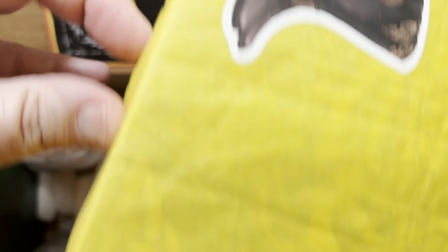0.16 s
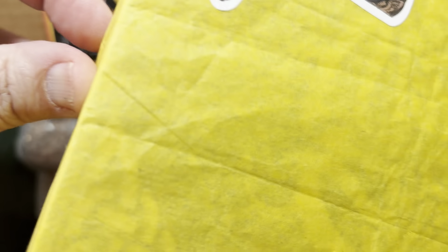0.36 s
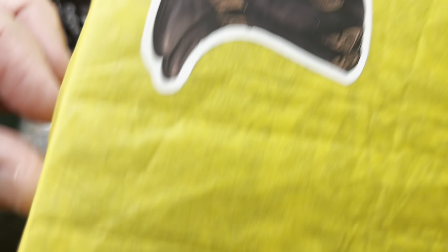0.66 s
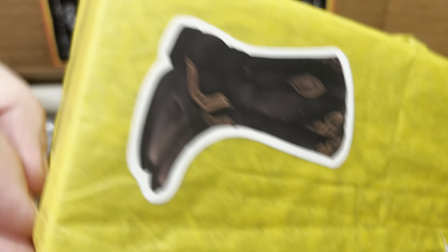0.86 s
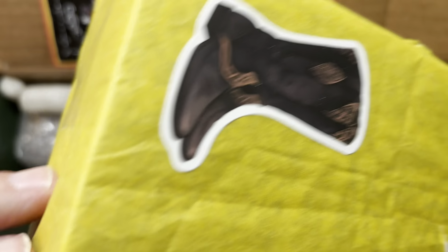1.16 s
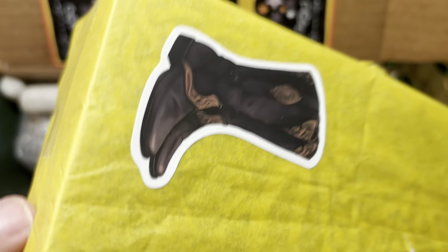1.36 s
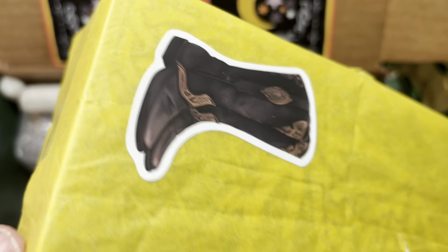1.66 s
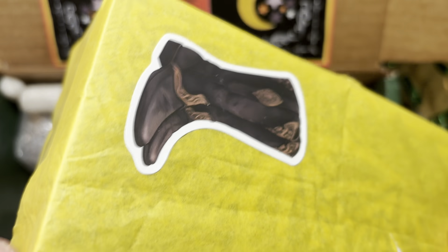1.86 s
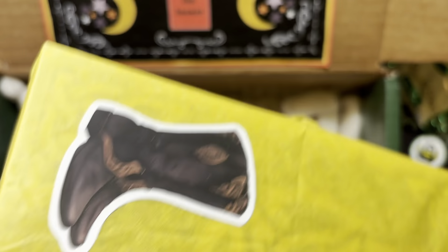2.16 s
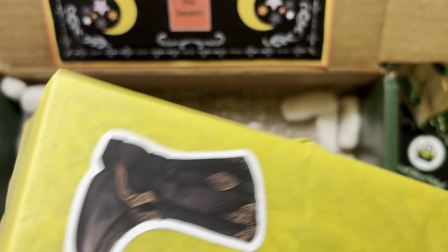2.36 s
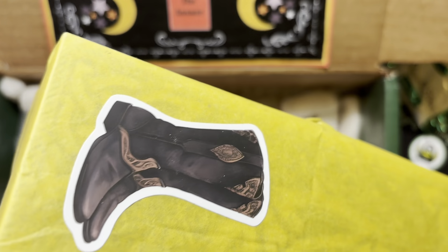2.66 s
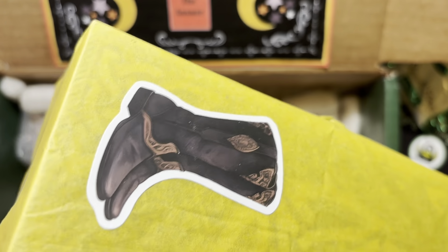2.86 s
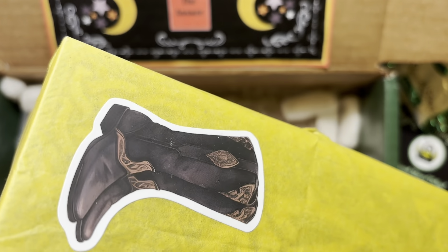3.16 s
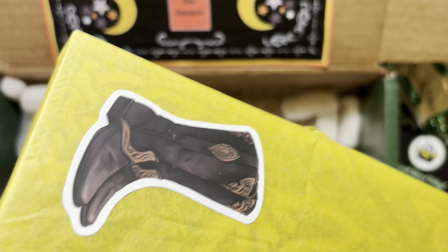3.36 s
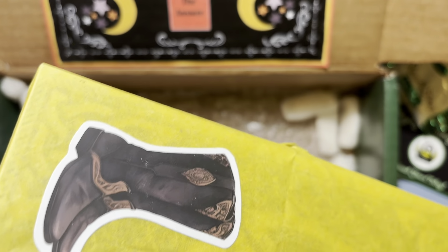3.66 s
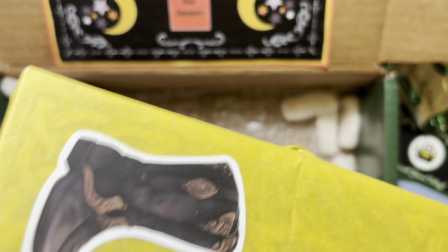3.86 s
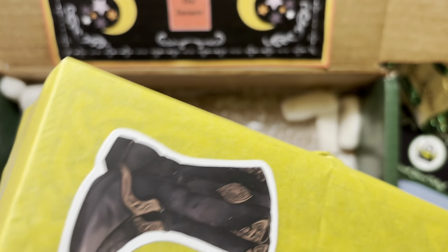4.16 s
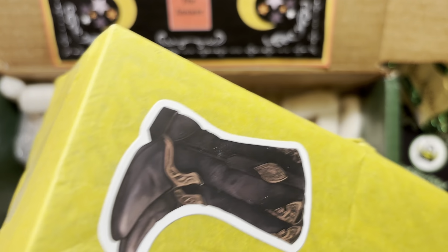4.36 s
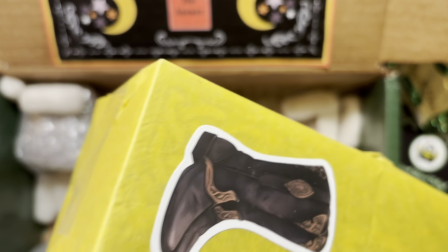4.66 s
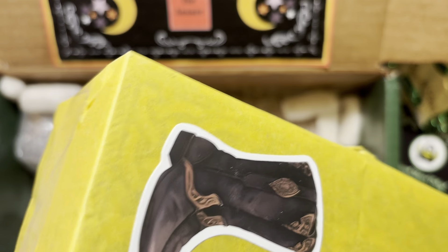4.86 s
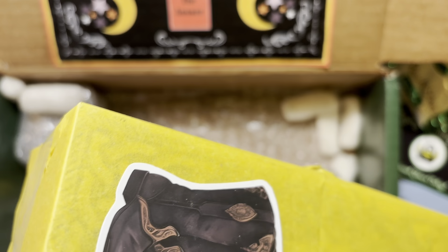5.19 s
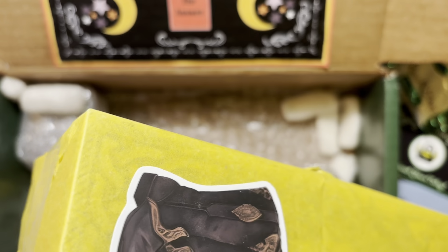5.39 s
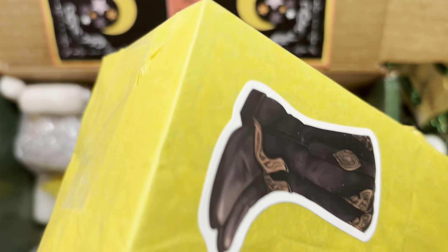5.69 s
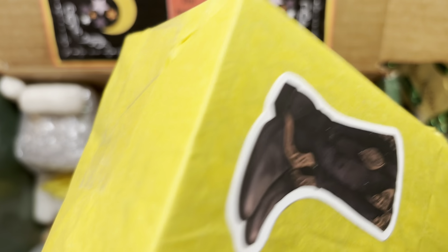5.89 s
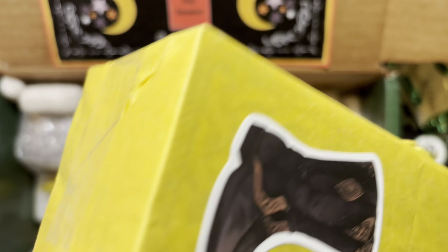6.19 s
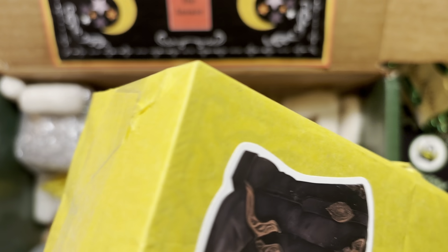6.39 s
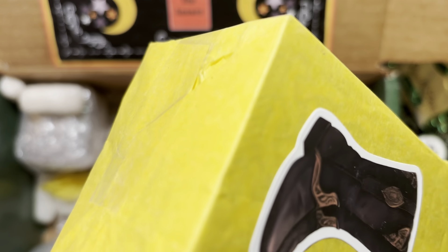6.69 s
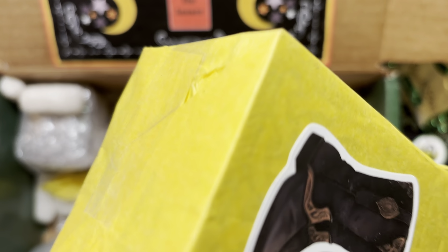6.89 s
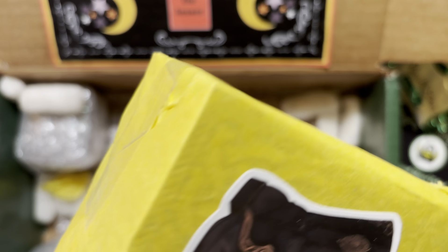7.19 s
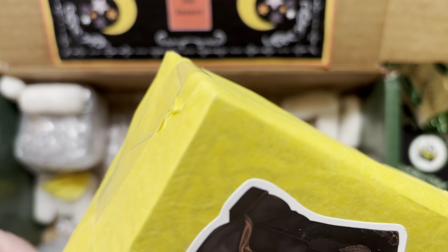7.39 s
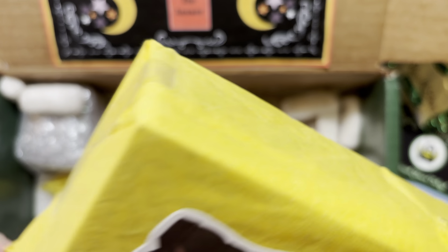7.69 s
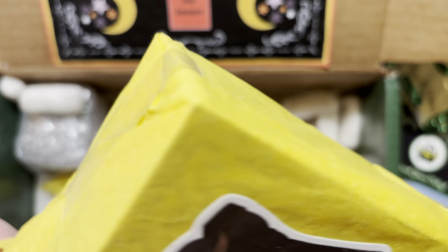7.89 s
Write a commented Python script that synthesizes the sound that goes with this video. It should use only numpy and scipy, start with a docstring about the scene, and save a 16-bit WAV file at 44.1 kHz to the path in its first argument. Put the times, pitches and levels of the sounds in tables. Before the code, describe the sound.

Very close stereo sound of fingers on a small cardboard box wrapped in thin tissue paper. Light slides and small crease snaps open it, with one sharper crackle and soft knock at about two seconds. After a quiet stretch come dense crackling pulls and a hollow knock, then nearly continuous crisp crinkling and tearing to the end. Quiet, short-echoing room.

```python
"""In a quiet room, hands turn a cardboard gift box wrapped in thin tissue paper, close to the microphone.
Fingers slide, pull and tear: sliding is filtered hiss, tearing is a crackle of tiny random clicks, and
the sheet rustles along. Creases snap as short bursts of noise. The hollow box underneath answers with
dull rubs and soft knocks, made of fading sine waves. Low handling rumble, a faint hush and echoes
of the room lie around it all, in stereo."""
import sys
import numpy as np
from scipy import signal
from scipy.fft import rfft, irfft, next_fast_len
from scipy.io import wavfile
from scipy.ndimage import uniform_filter1d

SR = 44100
rng = np.random.default_rng(int(sys.argv[2]) if len(sys.argv) > 2 else 0)


def digitize_waveform(pressure):
    """Quantize a signal to 16-bit integers and store it at the path in sys.argv[1].

    Rows of a 2-D input are taken as channels; values are limited to [-1, 1].
    """
    field = np.atleast_2d(pressure).T
    bounded = np.clip(field, -1, 1)
    quanta = np.round(bounded * 32767).astype(np.int16)
    wavfile.write(sys.argv[1], SR, quanta)


N = 354563
TIME = np.arange(N) / SR
SIZE = next_fast_len(N + SR // 2, True)  # padded length for filtering
HZ = np.arange(SIZE // 2 + 1) * SR / SIZE

# Throughout: a t60 is the time [s] in which a sound fades by 60 dB.
# Colour tables give only the balance between pitches, not the loudness.

ATTACK_DB_PER_S, RELEASE_DB_PER_S, BOX_RELEASE_DB_PER_S = 997, 760, 600
ARCH_DB = 2


def stroke(t, hold, release_db_per_s):
    """Gain of one stroke: the fingers take hold, press hardest at the middle and let go."""
    arch = np.sin(np.pi * np.clip(t / hold, 0, 1)) - 2 / np.pi
    attack_db = ATTACK_DB_PER_S * np.minimum(t, 0)
    release_db = release_db_per_s * np.maximum(t - hold, 0)
    return from_db(attack_db + ARCH_DB * arch - release_db)


# Strokes of the fingers, from light slides to hard pulls; levels before the arch and later trims:
# (start time [s], hold time [s], fibre crackle level [dB], sheet rustle level [dB], box rub level [dB])
STROKES = [(0.084, 0.0083, -57, -47.5, -49.5), (0.117, 0.033, -60.5, -60.5, -62),
           (0.209, 0.037, -51, -53, -53), (0.303, 0.031, -57, -67, -86), (0.415, 0.059, -58.5, -61, -57.5),
           (0.554, 0.006, -61, -68, -69.5), (0.609, 0.067, -65.5, -71, -68.5), (0.79, 0.059, -62, -66, -73),
           (0.913, 0.16, -57.5, -69.5, -69.5), (1.19, 0.14, -73, -67.0, -67),
           (1.408, 0.06, -58.0, -63, -48.5), (1.625, 0.32, -65.0, -66.5, -62),
           (1.93, 0.11, -63.5, -76, -70), (2.065, 0.0067, -35.5, -45.0, -43),
           (2.098, 0.038, -46, -50, -45.0), (2.154, 0.076, -57.5, -62, -61.5),
           (2.439, 0.062, -67.5, -76.5, -71.0), (2.673, 0.12, -61, -70, -72.5),
           (2.811, 0.1, -65, -68, -68.5), (2.974, 0.046, -71, -72.5, -68), (3.15, 0.079, -72.5, -82, -71),
           (3.324, 0.11, -72.5, -72.5, -59.5), (3.549, 0.16, -66, -74, -67.5),
           (3.73, 0.068, -49, -60.5, -58), (3.851, 0.054, -29.5, -46, -46.5),
           (3.971, 0.05, -31.5, -45.5, -47), (4.027, 0.103, -36.5, -48.5, -50.5),
           (4.147, 0.084, -41.0, -53, -52), (4.229, 0.11, -35.5, -46.5, -49),
           (4.374, 0.054, -26.5, -43, -43), (4.396, 0.034, -26.5, -32, -38), (4.774, 0.13, -65, -78, -79.5),
           (5.05, 0.13, -58.5, -63.5, -63), (5.195, 0.055, -48.0, -52, -56.5),
           (5.247, 0.017, -38.5, -47.5, -44.5), (5.538, 0.096, -34.5, -47, -74.5),
           (5.638, 0.16, -54, -79, -94), (5.808, 0.019, -34, -49, -65), (5.847, 0.045, -28.5, -38, -62),
           (5.909, 0.017, -27.5, -33.5, -51.5), (6.078, 0.071, -53, -58.0, -77),
           (6.202, 0.096, -55.5, -64, -79), (6.275, 0.0089, -32.0, -46.5, -56),
           (6.372, 0.098, -40.5, -51.5, -71.5), (6.498, 0.12, -40.5, -49.5, -74.5),
           (6.611, 0.089, -37.5, -43.5, -68), (6.696, 0.13, -45, -50, -77),
           (6.937, 0.083, -41.0, -46.5, -70.0), (7.056, 0.039, -48, -49.0, -59.5),
           (7.119, 0.069, -51.5, -56, -67), (7.359, 0.029, -48.5, -60, -74),
           (7.457, 0.016, -50.5, -59.5, -68.5), (7.525, 0.078, -38, -52.0, -64.5),
           (7.665, 0.021, -32.5, -42, -49.5), (7.701, 0.093, -45.0, -55, -63.5),
           (7.824, 0.11, -34.5, -45, -50.0), (7.934, 0.2, -36.5, -47.5, -55.5)]
# The hands rest on the gift between strokes: (time [s], contact level before trims [dB])
CONTACT = [(0, -87), (0.75, -82), (1.2, -71.5), (1.9, -65.5), (2.35, -81), (3.1, -80), (3.5, -86),
           (3.75, -65), (4.4, -59), (4.62, -79), (4.8, -66), (4.98, -69.5), (5.3, -62), (5.55, -55),
           (6.01, -70.5), (6.3, -51), (6.9, -63), (7.3, -60.5), (8.04, -50)]
CONTACT_SHEET_DB = -6  # sheet compared with the contact
CONTACT_BOX_DB, CONTACT_BOX_FOLLOWS = -76.5, 0.088  # box at mean contact; its share of the swing
UNSTEADY_DB, UNSTEADY_PER_S = 1.5, 45  # the pressure of the fingers wavers
# Level of fibres and sheet rises and falls briefly around each snap:
# top compared with the level of the snap, speed of rise and fall
SWELL_DB, SWELL_DB_PER_S = -26, 1200


def hands():
    """Levels [dB] of fibres, sheet and box: strokes and swells around the snaps add power to the contact."""
    contact_db, = in_time(CONTACT)
    box_contact_db = CONTACT_BOX_DB + CONTACT_BOX_FOLLOWS * (contact_db - contact_db.mean())
    power = from_db([contact_db, contact_db + CONTACT_SHEET_DB, box_contact_db]) ** 2
    releases = np.array([[RELEASE_DB_PER_S], [RELEASE_DB_PER_S], [BOX_RELEASE_DB_PER_S]])
    for start, hold, *levels_db in STROKES:
        span = slice(*np.searchsorted(TIME, [start - .1, start + hold + .2]))
        gain = stroke(TIME[span] - start, hold, releases)
        power[:, span] += (from_db(levels_db)[:, None] * gain) ** 2
    for s, level_db, weight_db in SNAPS:
        span = slice(*np.searchsorted(TIME, [s - .05, s + .05]))
        swell_db = level_db + SWELL_DB - SWELL_DB_PER_S * np.abs(TIME[span] - s)
        power[:2, span] += from_db([swell_db, swell_db + weight_db + CONTACT_SHEET_DB]) ** 2
    return 10 * np.log10(power) + UNSTEADY_DB * drift(UNSTEADY_PER_S)


FLUTTER_DB, FLUTTER_T60_S = -26, .012  # weak flutter after each tiny crack


def crackle(per_s, spread_db, clump_db, t60, count=12):
    """Fibres catch and let go at random, in clumps and all sizes, each on one of a dozen facets; level near 1."""
    born = rng.random(N) < per_s / SR
    size_db = spread_db * np.minimum(rng.exponential(1, N), 4)
    sizes = from_db(size_db + clump_db * drift(220))
    slips = born * sizes * rng.choice([-1, 1], N)
    dealt = rng.integers(0, count, N)
    out = np.zeros(N)
    for k in range(count):
        out += signal.oaconvolve(slips * (dealt == k), facet(t60, FLUTTER_DB, FLUTTER_T60_S))[:N]
    # divide by the running loudness, so that busy and sparse crackle come out equally loud
    usual = uniform_filter1d(np.abs(out), size=1500) * np.sqrt(np.pi / 2)
    return out / (usual + 1e-9)


# How the fingers meet the paper: (time [s], share that catches and tears rather than slides [0-1])
GRIP = [(0, 0.12), (1.9, 0.12), (2.1, 0.55), (2.5, 0.06), (3.45, 0.35), (3.7, 1), (4.4, .9), (4.8, 0.18),
        (5.5, 0.93), (6.6, 0.98), (8.0, 0.5)]
# Colour of the tearing fibres, also used by the creases: (frequency [Hz], level per Hz [dB])
FIBRES = [(200, -51), (1200, -42.5), (2400, -6.5), (3700, -2.5), (4500, -1), (5400, 4), (7000, 1),
          (9500, 2.5), (12000, 2), (14000, 4), (15800, -4.5)]
# Colour of skin sliding on paper: (frequency [Hz], level per Hz [dB])
SLIDE = [(1500, -29), (3000, -3.5), (4200, -4.5), (5200, -6), (8000, -4), (10000, -2.5), (13000, -1.5),
         (15800, -7.5)]
# Colour of the rustling sheet, also used by the creases: (frequency [Hz], level per Hz [dB])
SHEET = [(60, -38), (350, -20), (700, -6), (1000, 4.5), (1200, 5.5), (1400, 1.5), (1750, 6), (2400, 4.5),
         (3200, -2), (5000, -13), (9000, -55.5)]


def wrapping(fibre_db, sheet_db, box_db):
    """Sliding skin hisses, gripped paper crackles; a harder pull frees more fibres a second."""
    grip = np.clip(in_time(GRIP)[0], 0, 1)
    caught, gliding = np.sqrt(grip), np.sqrt(1 - grip)
    per_s = 2000 * from_db(.55 * (fibre_db + 43.5))
    slips = caught * crackle(per_s, spread_db=3.5, clump_db=3.0, t60=0.0019)
    buckles = caught * crackle(per_s, spread_db=4.5, clump_db=-1.0, t60=0.0051)
    hiss = gliding * rng.standard_normal(N) * from_db(2.64 * drift(300))
    drag = crackle(3000, spread_db=2.0, clump_db=3.5, t60=0.0014)
    tearing = colour(slips * from_db(fibre_db - 0.45), FIBRES)
    sliding = colour(hiss * from_db(fibre_db + 0.64), SLIDE)
    # the sheet is shaken by the same slips and hiss, and buckles a little on its own
    shaking = 0.49 * slips + 0.76 * buckles + hiss
    sheet = colour(shaking * from_db(sheet_db - 1.9), SHEET)
    box = hollow(drag * from_db(box_db), ring_db=-3.5, dull_db=-5.5)
    return tearing + sliding + sheet + box


SNAP_FLUTTER_DB, SNAP_FLUTTER_T60_S = -15, .018


def facet(t60, tail_db, tail_t60, size=1024):
    """One patch of paper flips: a sharp crack of noise with a weaker, longer flutter; unit energy."""
    t = TIME[:size]
    fade = from_db(-60 * t / t60) + from_db(tail_db - 60 * t / tail_t60)
    burst = rng.choice([-1, 1], size) * rng.uniform(.5, 1, size) * fade
    return burst / np.sqrt(np.sum(burst ** 2))


# The clearest creases snapping through, before trims:
# (time [s], level [dB], weight of the sheet compared with the crack [dB])
SNAPS = [(0.089, -44, 14.5), (0.1973, -44, -1), (0.3252, -40.5, -4), (0.445, -39, 7), (0.653, -61, 21),
         (0.8237, -31, 1.5), (0.874, -37, -3.5), (0.973, -37.5, -2), (1.098, -46.5, 2), (1.11, -50, -9),
         (1.3247, -49.5, 3), (1.56, -42.5, 2.5), (1.593, -42.5, -5), (1.6593, -47, 0), (1.8824, -41.5, 5),
         (2.064, -25, 1), (2.108, -21, 3), (2.4105, -47.5, 4), (2.9757, -53, -2), (3.2948, -49.5, -21),
         (3.3108, -44.5, -14), (3.5887, -46, -17), (3.8112, -31.5, -12), (3.9081, -20, -15),
         (4.2061, -27.5, -0.5), (4.366, -26, -13), (4.378, -22, 0), (4.592, -40.5, -18), (4.7069, -45, -21),
         (5.1316, -35, -7), (5.2512, -30.5, -3), (5.2778, -39, -1), (5.2975, -33.5, -7), (5.328, -47, -14),
         (5.4098, -53, 4), (5.6235, -20, -4), (5.6575, -28, -5), (5.684, -35.5, 1.5), (5.799, -26, -20),
         (5.854, -19, 2), (6.082, -34, 0), (6.2801, -22, -24), (6.364, -29, -13), (6.4477, -28.5, -3),
         (6.46, -46.5, 22), (6.5445, -26, 2), (6.6347, -25, 5.5), (6.7249, -29.5, 12), (6.827, -32.5, 1),
         (6.9058, -36, -6.5), (6.9472, -36.5, 9), (7.189, -39, 2), (7.465, -32, -20), (7.5223, -31, -18),
         (7.6538, -25.5, -25), (7.7269, -30.5, 1)]


def creases(snaps):
    """A crease buckles with one bright crack; a louder one lasts longer, and the sheet moves as well."""
    bright, heavy = np.zeros(SIZE), np.zeros(SIZE)
    for s, level_db, weight_db in snaps:
        crack_t60 = 0.0015 * from_db(0.5 * (level_db + 28.5))
        crack = from_db(level_db + 19.0) * facet(crack_t60, SNAP_FLUTTER_DB, SNAP_FLUTTER_T60_S)
        at = int(s * SR)
        bright[at:at + len(crack)] += crack
        heavy[at:at + len(crack)] += crack * from_db(weight_db - 10.0)
    return colour(bright, FIBRES) + colour(heavy, SHEET)


# average rate, middle level, share of the fingers' level swing, middle weight of the sheet
SMALL_SNAPS_PER_S, SMALL_SNAP_DB, SMALL_SNAP_FOLLOWS, SMALL_WEIGHT_DB = 5, -45, 0.79, -2.5


def small_snaps(fibre_db, scatter_db, count=120):
    """Rows like SNAPS for small creases that go at random, louder the harder the fingers work."""
    when, chance, size, weight = rng.random((count, 4)).T
    at = (when * N).astype(int)
    effort_db = SMALL_SNAP_FOLLOWS * (fibre_db[at] - fibre_db.mean())
    level_db = SMALL_SNAP_DB + effort_db + scatter_db * (2 * size - 1)
    weight_db = SMALL_WEIGHT_DB + scatter_db * (2 * weight - 1)
    rows = np.transpose([TIME[at], level_db, weight_db])
    return rows[chance < SMALL_SNAPS_PER_S * N / SR / count]


# Colour of the box walls: (frequency [Hz], level per Hz [dB])
BOX = [(40, -26.5), (90, -12), (150, -3.5), (250, 1.5), (380, -0.5), (620, -1.5), (780, -4.5),
       (1100, -11.5), (2500, -40)]


def hollow(force, ring_db, dull_db):
    """Rubbing sets the modes of the box ringing and also sounds dully through its walls."""
    ring = box_ring(scatter_db=3.0)
    ringing = signal.oaconvolve(force, ring / np.sqrt(np.sum(ring ** 2)))[:N]
    return from_db(ring_db) * ringing + from_db(dull_db) * colour(force, BOX)


# Ringing modes of the cardboard box, before tilt and scatter:
# (frequency [Hz], level [dB], t60 [s])
BOX_MODES = [(125.6, -13.5, 0.07), (186, -15, 0.053), (284.4, -3.5, 0.035), (346, -2.5, 0.038),
             (434.4, 1, 0.032), (601, -4.5, 0.041), (740, -13, 0.028), (930, -19, 0.023),
             (1702, -14, 0.037)]


def box_ring(scatter_db, tilt_db=0, size=6000):
    """The box after one touch: fading sine waves, mixed by the hardness of the touch and by chance for its place."""
    hz, mode_db, t60 = np.transpose(BOX_MODES)[:, :, None]
    t = TIME[:size]
    octaves = np.log2(hz / np.median(hz))
    signs = (-1) ** np.arange(len(hz))[:, None]
    strengths = signs * from_db(mode_db + tilt_db * octaves + scatter_db * rng.standard_normal(hz.shape))
    return np.sum(strengths * np.sin(2 * np.pi * hz * t) * from_db(-60 * t / t60), axis=0)


# Fingers bumping the box; the level is before trims, the landing time sets how slowly the bump swells:
# (time [s], level [dB], hardness as tilt of the modes [dB per octave], landing time [s])
KNOCKS = [(0.082, -41, -5, 0.0018), (0.819, -43, 1.5, .002), (1.432, -46, -8, .006), (2.068, -31, 1, .0015),
          (2.824, -38.5, 3, 0.012), (3.85, -28.5, 2.5, 0.0024), (4.268, -35, -3.5, .003),
          (4.421, -22.5, 1, 0.0015), (5.255, -28, 2.5, .001), (7.778, -34, -1, .002)]
# Colour of a fingertip scuffing the box as it lands: (frequency [Hz], level per Hz [dB])
SCUFF = [(100, -14), (200, -15), (270, -3), (500, 0), (750, -0.5), (1000, -28), (2500, -23)]


def knocks(level_db, scuff_db, scuff_t60, size=6000):
    """A soft fingertip lands on the box: the modes swell and ring, and the skin scuffs briefly."""
    rings, scuffs, t = np.zeros(SIZE), np.zeros(SIZE), TIME[:size]
    for s, knock_db, hardness_db, landing_s in KNOCKS:
        at = int(s * SR)
        landing = 1 - np.exp(-t / landing_s)
        ring = box_ring(scatter_db=5.0, tilt_db=hardness_db, size=size)
        rings[at:at + size] += from_db(knock_db + level_db) * landing * ring
        scuff_fade = from_db(knock_db + scuff_db - 60 * t / scuff_t60)
        scuffs[at:at + size] += scuff_fade * landing * rng.standard_normal(size)
    return rings[:N] + colour(scuffs, SCUFF)


# The hand that holds the microphone shifts: (time [s], rumble level before a fixed lift [dB])
HANDLING = [(0, -66.5), (0.12, -66), (0.4, -74), (0.7, -68), (1.1, -73), (1.5, -65.5), (2.0, -68),
            (2.14, -54.5), (2.3, -68.5), (2.6, -76), (3.7, -76.5), (4.3, -74), (4.45, -65), (4.6, -79),
            (5.25, -74), (5.6, -86), (8.0, -95)]
# Colour of the handling rumble: (frequency [Hz], level per Hz [dB])
RUMBLE = [(20, -22), (45, 6.5), (70, 8), (120, -0.5), (200, -7), (450, -32.5)]


def handling_rumble():
    """The shifting hand rumbles: low filtered noise whose level follows a curve and wavers."""
    level_db = in_time(HANDLING)[0] + 3.5 + 1.8 * drift(24)
    return colour(rng.standard_normal(N) * from_db(level_db), RUMBLE)


AIR_DB = -77
# Colour of the hush of the room: (frequency [Hz], level per Hz [dB])
AIR = [(20, -13), (60, -4), (120, 1.5), (400, -19.5), (1500, -15.5), (4000, -31.5), (9000, -55),
       (15000, -26)]


def room_hush():
    """The faint hush of the room: steady filtered noise."""
    return from_db(AIR_DB) * colour(rng.standard_normal(N), AIR)


NEAR_DB, NEAR_T60_S = -11, .014
ROOM_DB, ROOM_T60_S = -13, 0.092


def room(x, count=3):
    """Hands and carton reflect at once, along paths that change; the furnished room answers later."""
    near = sum(reflections(x * drift(25), NEAR_DB, NEAR_T60_S, gap_s=.0004) for _ in range(count))
    return near / np.sqrt(count) + reflections(x, ROOM_DB, ROOM_T60_S, gap_s=0.0024)


def reflections(x, level_db, t60, gap_s):
    """A diffuse spray of echoes after a short gap: fading noise, different at each port."""
    t = TIME[:SR // 3]
    tail = rng.standard_normal((2, len(t))) * from_db(-60 * t / t60) * (t > gap_s)
    tail /= np.sqrt(np.sum(tail ** 2, axis=1, keepdims=True))
    return from_db(level_db) * signal.oaconvolve(x[None], tail, axes=1)[:, :N]


# The two microphone ports: (frequency [Hz], phase by which left leads right [radians])
PORTS = [(0, 0), (1810, -0.1), (2580, 2.6), (3010, 3.0), (3450, 1.2), (4480, 1.9), (5000, 1.1), (5510, 2.8),
         (7670, 5.9), (8790, 6.9), (10400, 9.1), (13800, 12.8), (15700, 15.4), (16200, 15.6)]


def ports(x):
    """The direct sound reaches the two ports in step in the bass, out of step in the treble."""
    lead = np.interp(HZ, *np.transpose(PORTS))
    # each side takes half of the lead, in opposite directions
    turn = np.exp(.5j * lead * [[1], [-1]])
    return irfft(rfft(x, SIZE) * turn, SIZE)[:, :N]


def from_db(db):
    """Decibels to gain."""
    return 10 ** (np.asarray(db) / 20)


def rms_one(x):
    """Scale to unit rms (an average strength of 1)."""
    return x / np.sqrt(np.mean(x ** 2) + 1e-20)


def in_time(rows):
    """Each column of a curve at every sample."""
    s, *columns = np.transpose(rows)
    return [np.interp(TIME, s, c) for c in columns]


def drift(rate):
    """Random wandering of unit rms: straight lines between new chance values, `rate` a second."""
    return rms_one(np.interp(TIME * rate, np.arange(8192), rng.standard_normal(8192)))


def colour(x, spectrum):
    """Filter to the given spectrum without sounding early (minimum phase); keeps the power of white noise."""
    hz, db = np.transpose(spectrum)
    gain = rms_one(from_db(np.interp(np.log(HZ + 1), np.log(hz), db)))
    # folding the cepstrum finds the phase that goes with this gain
    cepstrum = irfft(np.log(gain), SIZE)
    cepstrum[1:SIZE // 2] *= 2
    cepstrum[SIZE // 2 + 1:] = 0
    return irfft(rfft(x, SIZE) * np.exp(rfft(cepstrum)), SIZE)[..., :N]


def scene():
    """Paper and box close by, over handling rumble and the faint hush of the room."""
    fibre_db, sheet_db, box_db = hands()
    snaps = [*SNAPS, *small_snaps(fibre_db, scatter_db=1.5)]
    paper = wrapping(fibre_db, sheet_db, box_db) + creases(snaps)
    gift = paper + knocks(level_db=-0.5, scuff_db=-12.5, scuff_t60=0.11)
    direct = gift + room_hush() + handling_rumble()
    return ports(direct) + room(gift)


CUTOFF_HZ = 15850


def record(dry):
    """The top of the treble is cut steeply by a low-pass filter."""
    low_pass = signal.ellip(12, .1, 80, CUTOFF_HZ, fs=SR, output="sos")
    return signal.sosfilt(low_pass, dry)


dry = scene()
out = record(dry)
digitize_waveform(out)
```